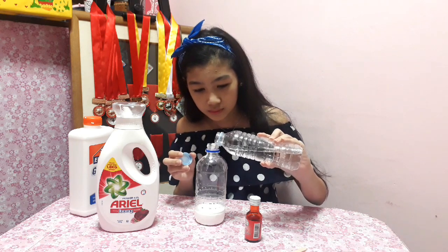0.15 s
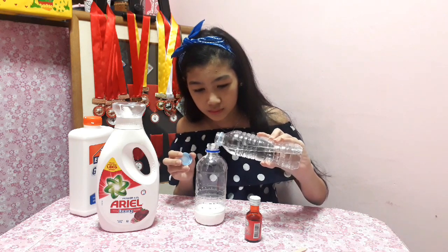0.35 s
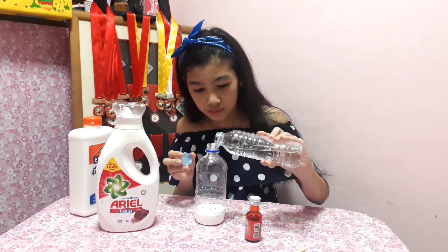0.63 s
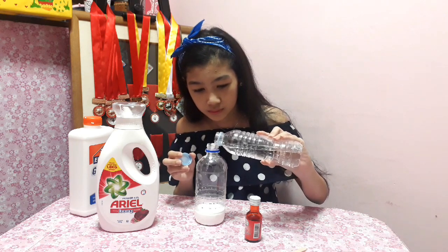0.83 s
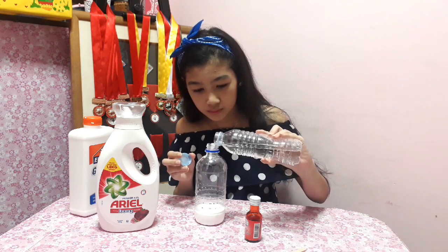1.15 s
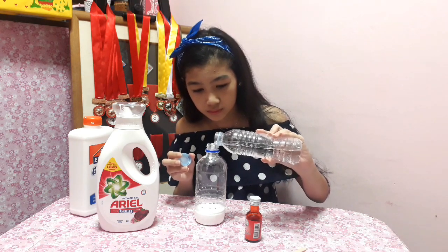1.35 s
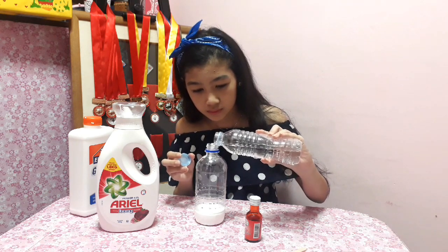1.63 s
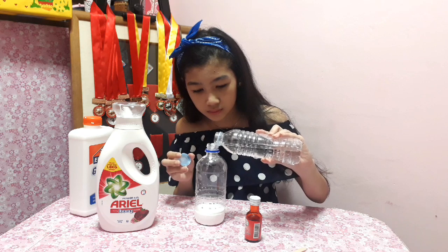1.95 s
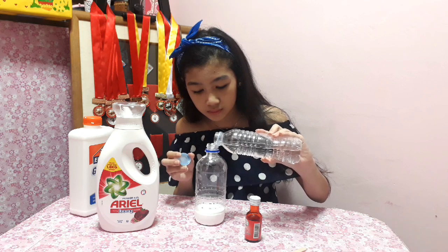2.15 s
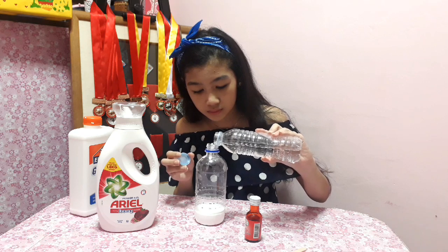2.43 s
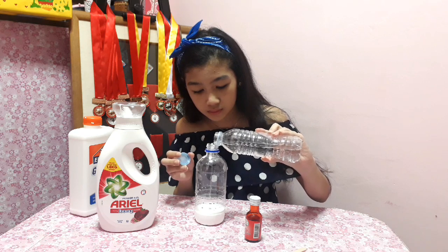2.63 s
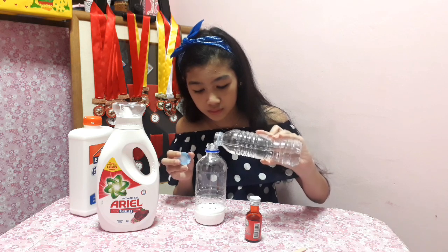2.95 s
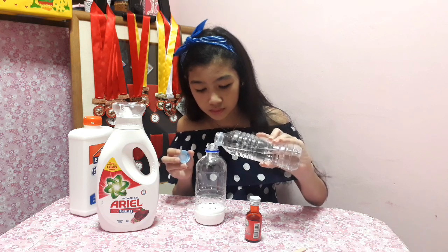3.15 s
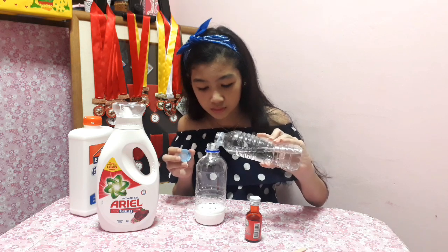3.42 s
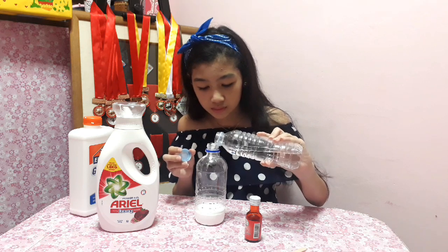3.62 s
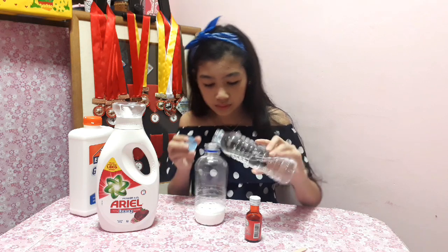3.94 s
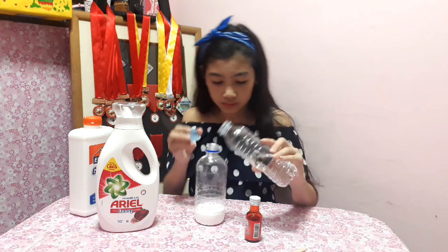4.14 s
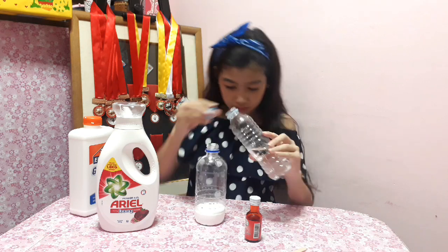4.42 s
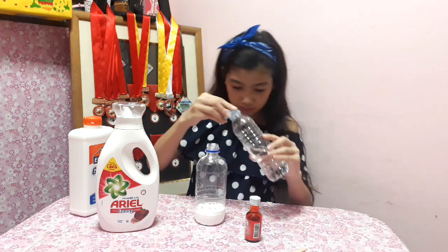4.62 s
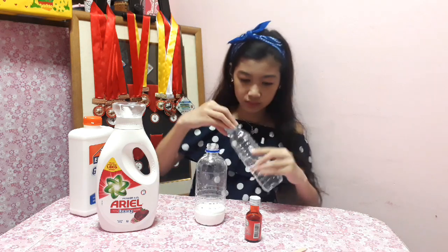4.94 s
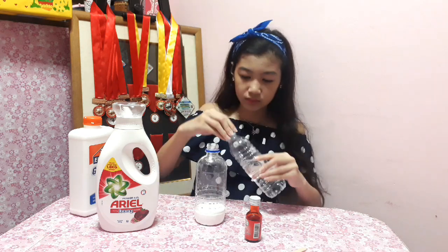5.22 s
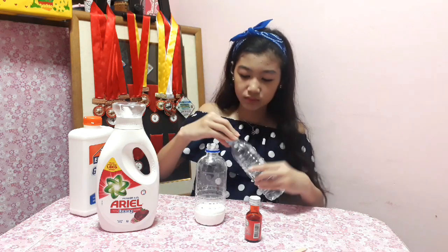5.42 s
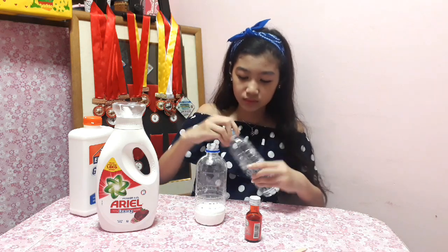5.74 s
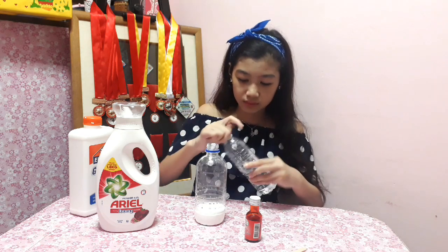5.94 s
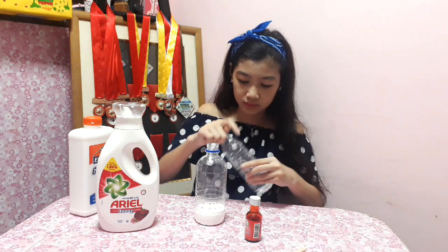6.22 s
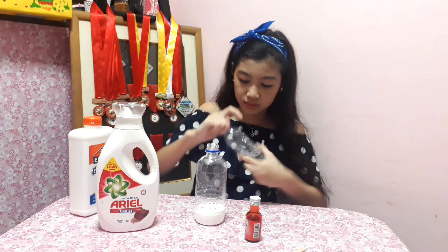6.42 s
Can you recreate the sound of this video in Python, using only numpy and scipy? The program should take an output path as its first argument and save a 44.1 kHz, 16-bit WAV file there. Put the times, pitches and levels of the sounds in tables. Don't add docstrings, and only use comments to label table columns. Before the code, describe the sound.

A quiet small room with hard walls, a low distant fan hum and soft hiss throughout. Nothing else stands out until about 1.6 s, when a short bubbly trickle of water falls into a thin plastic bottle, ending near 1.85 s. A second, longer trickle runs from 2.4 to 3.2 s, with bright blips, plops and faint hollow ringing. After a pause, from 3.93 to 4.4 s the tipped bottle glugs back in low, round, booming pulses with light slaps. Faint plastic ticks begin at 4.6 s; a hard, bright cap knock lands at 4.9 s. Fingers crinkle and scrape the wall from 5.05 to 5.7 s, with a sharper click at 5.66 s. At 6.1 s a dent pops out in a very loud, rapid burst of snaps, the loudest moment. Small dry clicks and rubs follow from 6.35 to 6.55 s, each with a brief room tail.

```python
import sys
import numpy as np
from scipy import signal
from scipy.fft import rfft, irfft, next_fast_len
from scipy.io import wavfile
from scipy.ndimage import map_coordinates

SR = 44100
rng = np.random.default_rng(int(sys.argv[2]) if len(sys.argv) > 2 else 0)


def natural_amplitude(level_db):
    exponent = np.asarray(level_db, float) / 20
    return 10 ** exponent


def output_pcm(signal):
    pcm = np.clip(np.atleast_2d(signal).T, -1, 1) * 32767
    wavfile.write(sys.argv[1], SR, np.round(pcm).astype(np.int16))


N = 290222
SPAN = 8192


def unit(x):
    return x / np.sqrt(np.mean(x ** 2) + 1e-20)


def along(points, hz):
    f, v = np.transpose(points)
    return np.interp(np.log(hz + 1), np.log(f + 1), v)


def filtered(x, response):
    m = next_fast_len(x.shape[-1] + 8192)
    spectrum = rfft(x, m) * response(np.fft.rfftfreq(m, 1 / SR))
    return irfft(spectrum, m)[..., :x.shape[-1]]


def causal(db):
    cepstrum = irfft(np.log(natural_amplitude(db) + 1e-6))
    cepstrum[..., 1:SPAN // 2] *= 2
    cepstrum[..., SPAN // 2 + 1:] = 0
    return irfft(np.exp(rfft(cepstrum)))


def shelf(hz, edge_hz):
    return 1 / (1 + (edge_hz / (hz + 1)) ** 4)


def resonances(f, modes):
    total = 0
    for k, (centre, width, db) in enumerate(modes):
        damping = 1j * f * width
        total = total + (-1) ** k * natural_amplitude(db) * damping / (centre * centre - f * f + damping)
    return total


def ring(hz, life, count):
    turns = hz * np.arange(count) / SR
    return np.sin(2 * np.pi * turns) * natural_amplitude(-60 * turns / life) * (1 - np.exp(-turns / 0.62))


def tones(rows, life):
    return ring(np.transpose(rows)[2][:, None], life, count=SPAN)


def noise(spectrum, db):
    return natural_amplitude(db) * unit(filtered(rng.standard_normal(N), lambda f: natural_amplitude(along(spectrum, f))))


def grains(rate, spread_db):
    strength = rng.standard_normal(N) * natural_amplitude(spread_db * rng.exponential(size=N))
    return unit((rng.random(N) < rate / SR) * strength)


def swells(s, db, rise_s, fall_s):
    s, db, rise_s, fall_s = [np.reshape(v, (-1, 1)) for v in (s, db, rise_s, fall_s)]
    t = np.arange(0, N + 64, 32) / SR - s
    slope = np.where(t < 0, 1 / np.abs(rise_s), -1 / np.abs(fall_s))
    level = (db + 20 * slope * t).max(axis=0)
    return np.interp(np.arange(N), np.arange(len(level)) * 32, level)


def shiver(count, share, t60, spread):
    t, bins = np.arange(SPAN) / SR, np.linspace(0, 1, SPAN // 2 + 1)
    lags = np.array([np.interp(bins, np.linspace(0, 1, 24), row) for row in rng.random((count, 24))])
    blow = irfft(np.exp(-2j * np.pi * np.cumsum(spread * lags, axis=1) * SR / SPAN))
    blow = blow * (t < .05)
    return blow + share * rng.standard_normal((count, SPAN)) * natural_amplitude(-60 * t / t60)


# (frequency [Hz], t60 [s])
ROOM_DECAY = [(200, 0.18), (1000, 0.17), (3000, 0.21), (8000, 0.19), (14000, 0.15)]


def tails(count):
    hz, t, z = signal.stft(rng.standard_normal((count, SPAN)), SR, nperseg=256)
    decay = natural_amplitude(-60 * t / along(ROOM_DECAY, hz)[:, None])
    tail = signal.istft(z * decay, SR, nperseg=256)[1][:, :SPAN]
    t = np.arange(SPAN) / SR
    tail = tail * np.clip(t / 0.00078, 0, 1) ** 2 * (1 + 0.5 * np.exp(-t / 0.013))
    return tail / np.linalg.norm(tail, axis=1, keepdims=True)


def placed(rows, shapes, wet_db):
    heard = shapes + natural_amplitude(wet_db) * signal.fftconvolve(shapes, tails(len(rows)), axes=1)[:, :SPAN]
    out = np.zeros(N + SPAN)
    for (s, db, *_), x in zip(rows, heard):
        out[round(s * SR):][:SPAN] += natural_amplitude(db) * x / np.abs(x).max()
    return out[:N]


def roomy(x, wet_db):
    return x + natural_amplitude(wet_db) * signal.fftconvolve(x, tails(1)[0])[:N]


def clicks(rows, spectrum, boom_db, wet_db, wetter):
    hz = np.fft.rfftfreq(SPAN, 1 / SR)
    _, db, bite_db, snap_db = np.transpose(rows)[:, :, None]
    colour = along(spectrum, hz) + boom_db * (1 - shelf(hz, edge_hz=500))
    colour = colour + (bite_db + 6.0) * shelf(hz, edge_hz=1920)
    colour = colour + (snap_db - bite_db + 5.0) * shelf(hz, edge_hz=3350)
    blows = shiver(len(rows), share=0.096, t60=0.0098, spread=0.001595)
    snaps = signal.fftconvolve(blows, causal(colour), axes=1)
    return placed(rows, snaps[:, :SPAN], wet_db + wetter * (db.max() - db))


# (frequency [Hz], level [dB])
FAN_LINES = [(172.3, -73.5), (285.3, -74), (398.4, -80)]
# (frequency [Hz], density [dB per Hz])
RUMBLE = [(12, -33), (20, -14), (31, -22), (49, -8), (97, -10), (162, -2), (299, -7), (600, -22),
          (780, -29), (1320, -120)]
# (frequency [Hz], density [dB per Hz])
MICROPHONE_HISS = [(240, -28), (400, -5.5), (432, -11), (597, -9.5), (729, -11.5), (1010, -11.5),
                   (1620, -14.5), (3240, -18), (7790, -27), (12200, -28), (15800, -29)]


def air():
    wander = rng.standard_normal((len(FAN_LINES), 60))
    where = np.mgrid[:len(FAN_LINES), :N] * [[[1]], [[8 / SR]]]
    waver = map_coordinates(wander, where, order=1)
    hz, db = np.transpose(FAN_LINES)[:, :, None]
    lines = natural_amplitude(db + 3.5 + 3.5 * waver) * np.sin(2 * np.pi * hz * np.arange(N) / SR + 0.85 * waver)
    return lines.sum(axis=0) + noise(RUMBLE, -61.5) + noise(MICROPHONE_HISS, -65)


# (pitch [Hz], density [dB per Hz])
FROTH_SIZES = [(290, -47), (500, -19), (680, -9), (758, 1), (900, -7.5), (1530, -23), (1930, -3),
               (3060, -27), (3530, -8.5), (5830, -12), (6740, -13), (7890, -10.5), (10500, -20),
               (15500, -3)]
# (frequency [Hz], width [Hz], level [dB])
RECEIVER_WALL = [(1120, 100, -6.5), (1585, 84, -5.5), (2300, 610, -12.5), (3020, 78, -4.5)]


def froth():
    draw = rng.random((14000, 3))
    hz = 500 * natural_amplitude(28.25 * draw[:, 1:2])
    size = natural_amplitude(along(FROTH_SIZES, hz) - 1.5 * np.log(draw[:, 2:])) * hz
    where = (draw[:, :1] * N).astype(int) + np.arange(300)
    pulses = size * ring(hz, life=5.4, count=300)
    foam = unit(np.bincount(where.ravel(), pulses.ravel())[:N])
    wall = unit(filtered(foam, lambda f: resonances(f, RECEIVER_WALL)))
    return unit(foam + natural_amplitude(-0.5) * wall)


# (frequency [Hz], width [Hz], level [dB])
BOTTLE_AIR = [(240, 39, -0.5), (452, 64, -8.5), (763, 114, -3)]
# (time [s], level [dB])
ROCKING = [
    (3.9, -57),
    (3.99, -53),
    (4.116, -45.5),
    (4.172, -50),
    (4.364, -51.5),
    (4.45, -60),
    (4.55, -74),
]
# (time [s], strength [dB], plunge depth [dB])
STREAM_SURGES = [(1.638, -48.5, -5.5), (1.69, -49.5, -5.5), (1.745, -50.5, 0), (1.81, -53.5, -6),
                 (2.428, -59, -6), (2.446, -49, -11), (2.546, -52.5, -16), (2.618, -45.5, -2),
                 (2.713, -46, -7.5), (2.79, -54.5, -4.5), (2.85, -48.5, -3), (2.92, -46, -8),
                 (2.99, -50.5, -9), (3.075, -50, -9), (3.138, -49, -10.5), (3.19, -59, -10),
                 (3.95, -48.5, -18), (4.03, -53, -21), (4.085, -56, -25), (4.13, -53.5, -23),
                 (4.305, -55.5, -21)]


def stream():
    drops = grains(rate=900, spread_db=1.0)
    lowest, higher = BOTTLE_AIR[:1], BOTTLE_AIR[1:]
    hollow = unit(filtered(drops, lambda f: resonances(f, lowest) * (1 - shelf(f, edge_hz=680))))
    gurgle = unit(filtered(drops, lambda f: resonances(f, higher) * (1 - shelf(f, edge_hz=1400))))
    s, db = np.transpose(ROCKING)
    rocking_db = np.interp(np.arange(N) / SR, s, db, -120, -120)
    out = natural_amplitude(rocking_db - 4.5) * (hollow + 0.23 * gurgle)
    s, db, deep_db = np.transpose(STREAM_SURGES)
    rise_s = 0.043
    out = out + natural_amplitude(swells(s, db - 10.0, rise_s, fall_s=0.084)) * froth()
    out = out + natural_amplitude(swells(s, db + deep_db - 5.5, rise_s, fall_s=0.18)) * hollow
    out = out + natural_amplitude(swells(s, db + deep_db - 5.0, rise_s, fall_s=0.054)) * gurgle
    return roomy(out, wet_db=2.0)


# (start [s], end [s], pitch [Hz], width [Hz], level [dB])
SINGING_MODES = [(1.63, 1.71, 2380, 260, -61), (1.66, 1.8, 1550, 220, -63.5), (1.73, 1.82, 1200, 190, -66),
                 (1.64, 1.825, 715, 240, -65.5), (2.59, 2.73, 1490, 240, -60.5), (2.6, 2.74, 690, 140, -64),
                 (2.84, 2.94, 1100, 240, -63), (2.98, 3.01, 1070, 180, -63),
                 (3.075, 3.16, 1130, 180, -62.5), (3.93, 3.95, 1200, 700, -52), (3.97, 4.12, 246, 66, -53),
                 (3.04, 3.2, 1700, 200, -66.5), (5.4, 5.445, 906, 140, -61.5), (6.39, 6.46, 2150, 600, -65),
                 (5.27, 5.33, 1160, 300, -62), (4.705, 4.73, 1170, 400, -62.5), (4.8, 4.83, 1180, 250, -68),
                 (1.645, 1.69, 6300, 250, -66), (1.8, 1.825, 6600, 250, -65), (1.64, 1.69, 4900, 300, -66),
                 (1.64, 1.675, 3000, 120, -60), (1.74, 1.79, 7000, 700, -65), (1.77, 1.8, 9000, 900, -64),
                 (2.69, 2.725, 3050, 150, -61), (2.845, 2.87, 3050, 150, -61), (2.99, 3.03, 3050, 150, -64),
                 (3.07, 3.11, 3050, 150, -64), (6.365, 6.395, 1500, 900, -59), (5.665, 5.7, 2200, 700, -50),
                 (5.6, 5.7, 1100, 500, -58), (6.49, 6.52, 2300, 400, -60), (5.945, 5.99, 2900, 900, -68),
                 (4.62, 4.68, 2800, 440, -68), (4.905, 4.945, 900, 350, -49),
                 (4.905, 4.945, 2700, 500, -51), (5.09, 5.125, 1760, 820, -55),
                 (6.133, 6.16, 1200, 160, -33)]


def singing():
    t, drops = np.arange(N) / SR, grains(rate=1500, spread_db=1.6)
    out = np.zeros(N)
    for start, end, hz, width, db in SINGING_MODES:
        on = slice(round((start - .02) * SR), round((end + .06) * SR))
        attack = np.clip((t[on] - start) / 0.0089 + 1, 0, 1)
        release = natural_amplitude(-np.maximum(t[on] - end, 0) * 710)
        tone = unit(filtered(drops[on], lambda f: resonances(f, [(hz, width, 0)]) ** 2))
        out[on] += natural_amplitude(db) * attack * release * tone
    return out


# (pitch [Hz], [(time [s], peak [dB]), ..])
LARGE_BUBBLES = [
    (650, [(3.931, -48)]),
    (1110, [(1.735, -46), (1.7495, -42), (1.8155, -62), (2.7937, -48.5), (2.8423, -50), (2.8818, -47), (2.9224, -46), (2.9901, -48.5), (3.048, -51), (3.0772, -57), (3.1266, -45), (3.145, -52)]),
    (1300, [(3.945, -46), (4.3, -48)]),
    (1500, [(1.6865, -46.5), (1.7014, -45), (1.774, -54), (2.547, -53), (2.5975, -42.5), (2.6165, -32.5), (2.645, -46), (2.6574, -45), (2.6906, -41.5), (2.7087, -39), (2.746, -51)]),
    (1780, [(1.647, -44), (3.06, -56), (3.146, -53)]),
]
MIDDLE_BUBBLES = [
    (2360, [(1.628, -41), (1.6372, -45), (1.6985, -47), (2.4404, -45), (2.4685, -58), (2.5391, -55), (2.593, -43), (2.929, -55)]),
    (3038, [(1.636, -50), (1.659, -41), (2.44, -47), (2.5564, -51), (2.614, -46.5), (2.6903, -50), (2.771, -44), (2.836, -42.5), (2.907, -48.5), (2.9866, -49), (3.0686, -50.5), (3.1876, -56.5)]),
    (2625, [(2.452, -47), (2.47, -56), (3.934, -55), (3.944, -48)]),
    (3510, [(3.945, -41), (2.838, -49.5)]),
    (4790, [(1.637, -58), (2.5405, -42.5), (2.793, -57.5), (2.925, -47)]),
]
FINE_BUBBLES = [
    (6660, [(1.6494, -56), (1.738, -56), (1.8013, -54), (2.9072, -37), (2.9179, -42)]),
    (7220, [(1.736, -49.5), (2.6004, -48), (2.6933, -45), (2.7072, -44)]),
    (8800, [(1.6207, -52), (1.63, -47), (1.77, -51.5), (2.4234, -53), (2.6239, -49), (2.8674, -50), (2.545, -54), (2.355, -61), (2.9644, -44.5), (2.9743, -41.5), (3.069, -53), (3.121, -52)]),
    (10300, [(1.7694, -52), (1.785, -51), (2.6145, -51), (2.6918, -49), (2.7077, -40), (2.7197, -40), (2.8787, -49), (2.8994, -47)]),
    (13100, [(2.693, -52), (2.708, -46), (2.836, -50), (2.908, -52)]),
]


def bubbles():
    sizes = LARGE_BUBBLES + MIDDLE_BUBBLES + FINE_BUBBLES
    rows = [(s, db, hz) for hz, times in sizes for s, db in times]
    hz = np.transpose(rows)[2][:, None]
    scatter = .009 * np.where(hz < 2000, 3, 1)
    hz = hz * (1 + scatter * rng.standard_normal((len(rows), 1)))
    life = np.where(hz < 3300, 93 * (hz / 3000) ** 1.2, 52)
    return placed(rows, ring(hz, life, count=SPAN), wet_db=2.5)


# (time [s], peak [dB], pitch [Hz])
STANDING_AIR = [(1.633, -50, 245), (1.693, -48, 213), (1.743, -48, 222), (1.813, -51.5, 234),
                (2.559, -43, 223), (2.616, -40, 260), (2.688, -43.5, 221), (2.709, -43.5, 240),
                (2.791, -49.5, 217), (2.836, -46.5, 228), (2.898, -43.5, 261), (2.982, -51, 242),
                (3.108, -49, 229)]
TIPPED_AIR = [
    (3.97, -31, 230),
    (4.024, -30.5, 262),
    (4.078, -35.5, 259),
    (4.123, -42, 280),
    (4.165, -44, 281),
    (4.234, -41, 270),
    (4.267, -36, 265),
    (4.301, -33, 217.5),
    (4.344, -44, 215),
]
TIPPED_OVERTONES = [(3.945, -51, 420), (3.979, -37, 465), (4.031, -29.5, 468), (4.079, -36, 472),
                    (4.133, -37, 472), (4.235, -41, 404), (4.274, -40, 395), (4.302, -35.5, 476),
                    (3.971, -39, 351), (4.079, -39, 400), (4.302, -40, 341), (4.235, -43, 330)]


def bottle_air():
    lowest = STANDING_AIR + TIPPED_AIR
    out = placed(lowest, tones(lowest, life=26), wet_db=-7.0)
    out = out + placed(TIPPED_OVERTONES, tones(TIPPED_OVERTONES, life=30), wet_db=-4)
    return natural_amplitude(-3.0) * out


# (time [s], peak [dB], pitch [Hz])
WALL_KNOCKS = [(4.8865, -50, 1100), (4.898, -41, 299), (4.898, -31, 1036), (4.899, -38, 840),
               (4.898, -26.5, 2840), (4.928, -37, 2770), (6.176, -29.5, 1240), (6.122, -26, 1480),
               (6.097, -26.5, 563), (6.104, -28.5, 621), (6.127, -29, 660), (6.128, -27, 1450),
               (6.131, -24, 1800), (6.134, -27.5, 915), (6.097, -20, 3250), (6.134, -20, 3400),
               (6.535, -36.5, 1025), (6.471, -48, 2200), (6.479, -39, 2220), (5.662, -31, 2130),
               (5.662, -29.5, 2960), (4.268, -40.5, 1100), (4.079, -43, 1300), (3.971, -50, 1250),
               (6.132, -24, 2060), (6.103, -24, 2010), (6.097, -26, 2750), (6.124, -25, 3200),
               (6.184, -36, 3300), (6.125, -23, 1720), (6.539, -41, 1670), (6.535, -46, 4000),
               (6.491, -45, 2450), (6.553, -46, 1520), (6.471, -45, 3100), (5.1, -48, 2800),
               (4.703, -50, 3100), (5.2, -52, 3000), (5.42, -50, 3500), (5.314, -47, 2400),
               (2.596, -46.5, 760), (2.62, -42.5, 1010), (4.304, -42, 1200), (4.081, -43, 1180)]


def knocks():
    return placed(WALL_KNOCKS, tones(WALL_KNOCKS, life=21.0), wet_db=-2.0)


# (time [s], peak [dB], second mode [dB], slap above 900 Hz [dB])
WATER_SLAPS = [(2.617, -33, -9, -2), (2.709, -37, -6, -8), (3.943, -31.5, -8, -11), (3.97, -27.5, -15, -22),
               (4.024, -29, -16, -14), (4.033, -29.5, 3.5, -16), (4.078, -31, -8, -13),
               (4.124, -32, -4, -9.5), (4.132, -36, 4, -18), (4.171, -41, -1, -7), (4.21, -41.5, 1, -22),
               (4.233, -38.5, -5, -16), (4.268, -35, -13, -13.5), (4.3, -31.5, -5, -20),
               (4.31, -38, 3, -17), (4.359, -46, -26, -26)]
# (frequency [Hz], density [dB per Hz])
SLAP_COLOUR = [(59, -17), (100, -14), (173, -13.5), (259, -12.5), (327, -9.5), (469, -5), (618, -14),
               (764, -6.5), (944, -15), (1190, -8), (1540, -19), (2110, -18.5), (4620, -35.5),
               (8550, -42.5), (15800, -69)]


def glugs():
    hz = np.fft.rfftfreq(SPAN, 1 / SR)
    _, _, second_db, slap_db = np.transpose(WATER_SLAPS)[:, :, None]
    colour = along(SLAP_COLOUR, hz) + (second_db + 4) * shelf(hz, edge_hz=360)
    colour = colour + (slap_db - second_db + 2) * shelf(hz, edge_hz=900)
    colour = colour + 0.5 * shelf(hz, edge_hz=3500)
    colour = colour - 25 * (1 - shelf(hz, edge_hz=128))
    blows = shiver(len(WATER_SLAPS), share=0.061, t60=0.048, spread=0.00405)
    slaps = signal.fftconvolve(blows, causal(colour), axes=1)
    return placed(WATER_SLAPS, slaps[:, :SPAN], wet_db=-2.5)


# (time [s], peak [dB], pitch [Hz], life [cycles])
TABLE_PUSHES = [
    (3.23, -52, 74.5, 8),
    (4.899, -52, 122, 3.6),
    (5.521, -47, 403, 3.6),
    (6.11, -50, 55, 3.6),
]


def thumps():
    life = np.transpose(TABLE_PUSHES)[3][:, None]
    return placed(TABLE_PUSHES, tones(TABLE_PUSHES, life), wet_db=-5)


# (time [s], peak [dB], bite above 1.9 kHz [dB], snap above 3.4 kHz [dB])
WALL_CLICKS = [(4.59, -40, 12, -5.5), (4.703, -41.5, -7, -21), (4.759, -51.5, 3, -11),
               (5.067, -38.5, -15, -21), (5.079, -37, -17, -22), (5.089, -37, -8, -23),
               (5.099, -39, -7, -20), (5.153, -47.5, -24, -29), (5.303, -41, -11, -16),
               (5.314, -39, 4, -13), (5.349, -43, -1, -11), (5.42, -37.5, 5, -22), (5.449, -33, -4, -24.5),
               (5.587, -49, -24, -23), (5.599, -36.5, -15, -27), (5.614, -33.5, -8, -22),
               (5.632, -37, -3, -15), (5.661, -23.5, 4, -17.5), (5.668, -32, 0, -18), (5.725, -42, 0, 5),
               (5.826, -42, -30, -21.5), (5.949, -51.5, -6, 0), (6.037, -42, -5, -12),
               (6.378, -45.5, -5, -23), (6.409, -51, 10, -10), (6.471, -33, 5, -17), (6.478, -38, 2, -12),
               (6.491, -42.5, 8, -16), (6.535, -33, -14, -23), (6.345, -55, 8, -8), (6.439, -45, 5, -20),
               (5.7, -53, -8, -20), (5.372, -50, 0, -8)]
NECK_SPITS = [
    (3.996, -44.5, 11, 22),
    (4.091, -51, 14, 30),
]
# (frequency [Hz], density [dB per Hz])
PLASTIC_COLOUR = [(120, -55), (200, -5), (817, -4.5), (1040, -4.5), (1900, -7.5), (2280, -3.5),
                  (2630, -7.5), (3220, -10), (4480, -19), (7070, -23.5), (15800, -36.5)]


def wall_clicks():
    rows = [(s, db, bite, snap + 9) for s, db, bite, snap in WALL_CLICKS + NECK_SPITS]
    return clicks(rows, PLASTIC_COLOUR, boom_db=-8.5, wet_db=2.0, wetter=0.18)


# (time of peak [s], level [dB], rise [s per 20 dB], fall [s per 20 dB])
RUB_STROKES = [
    (4.61, -61, 0.36, 1.1),
    (5.074, -44, 0.023, 0.01),
    (5.46, -55, 0.46, -0.1),
    (5.605, -49, .02, 0.7),
    (5.7, -63.5, .1, 0),
    (6.04, -64, .02, -4.5),
    (6.385, -57.5, 0.12, 1.5),
    (6.383, -53, .06, .03),
    (6.5, -62, 0.11, -0.5),
]
CRACKLES = [
    (4.901, -45, .005, 0.041),
    (6.099, -30, .002, .06),
    (6.131, -24.5, 0.013, 0.061),
]


def creak():
    db, fizz_db = swells(*np.transpose(RUB_STROKES)), swells(*np.transpose(CRACKLES))
    ticks = filtered(grains(rate=2500, spread_db=-0.5), lambda f: natural_amplitude(along(PLASTIC_COLOUR, f)))
    dull = filtered(ticks, lambda f: 1 - shelf(f, edge_hz=4500))
    bright = (natural_amplitude(db - 6) + natural_amplitude(fizz_db)) * unit(ticks - dull)
    return roomy(natural_amplitude(-6.5) * (natural_amplitude(db) * unit(dull) + bright), wet_db=-3.0)


# (time [s], peak [dB], bite above 1.9 kHz [dB], snap above 3.4 kHz [dB])
CAP_BLOWS = [
    (4.8865, -40, -6, -19.5),
    (4.8978, -14, -14.5, -6),
    (4.9043, -25.5, -2, -13),
]
# (frequency [Hz], density [dB per Hz])
CAP_SPECTRUM = [(88, -37), (150, -16), (285, -4.5), (713, -6), (801, -4.5), (1010, -0.5), (1750, -11),
                (2630, 0.5), (3590, -11), (5000, -11), (5520, -17), (9900, -9.5), (11500, -19),
                (15800, -30)]


def cap():
    return clicks(CAP_BLOWS, CAP_SPECTRUM, boom_db=-2, wet_db=0.5, wetter=0.19)


# (time [s], peak [dB], bite above 1.9 kHz [dB], snap above 3.4 kHz [dB])
DENT_SNAPS = [
    (6.0968, -10.5, 8.5, 3.5),
    (6.1042, -13.5, -2.5, -8.5),
    (6.112, -26, 2, -7),
    (6.1225, -18, 1, -15),
    (6.1268, -6.5, -6, -9),
    (6.131, -15.5, 5, -23),
    (6.1345, -11.5, 3, -12),
]
# (frequency [Hz], density [dB per Hz])
DENT_SPECTRUM = [(88, -81), (150, -33), (291, -18.5), (430, -17.5), (610, -8), (919, -5), (1010, -6.5),
                 (1210, 3), (1360, -4.5), (1710, -0.5), (2300, -10.5), (3250, -3.5), (3850, -15.5),
                 (5200, -16.5), (8470, -17.5), (15800, -29.5)]


def dent():
    return clicks(DENT_SNAPS, DENT_SPECTRUM, boom_db=5.0, wet_db=1.5, wetter=0.11)


def scene():
    water = stream() + singing() + bubbles() + bottle_air() + knocks() + glugs()
    plastic = wall_clicks() + creak() + cap() + dent()
    mid = air() + water + thumps() + plastic
    return np.array([mid, mid])


def roll_off(x):
    return signal.sosfilt(signal.butter(12, 16680, fs=SR, output="sos"), x)


# (frequency [Hz], density [dB per Hz])
AMPLIFIER_HISS = [(12, -37), (20, -9), (158, -2), (203, -1), (386, -1.5), (469, -0.5), (1320, -4),
                  (1740, -5), (2960, -6.5), (13400, -19), (15800, -17)]


def record(dry):
    both = dry + [[1], [-1]] * noise(AMPLIFIER_HISS, -71)
    limited = filtered(both, lambda f: np.clip((15870 - f) / 300, 0, 1))
    return roll_off(limited - .0009)


dry = scene()
out = record(dry)
output_pcm(out)
```